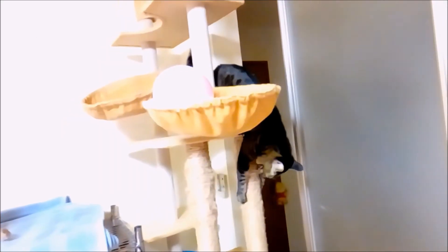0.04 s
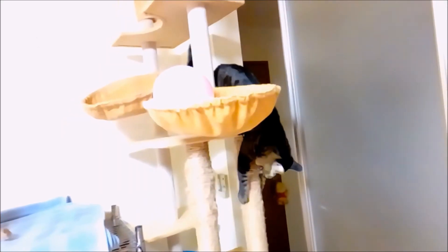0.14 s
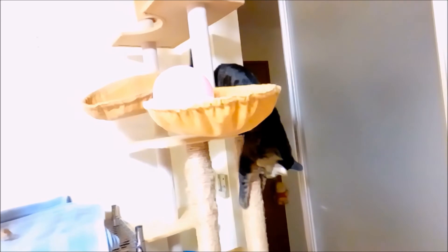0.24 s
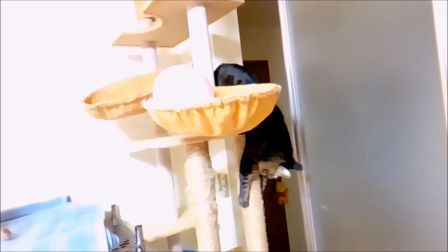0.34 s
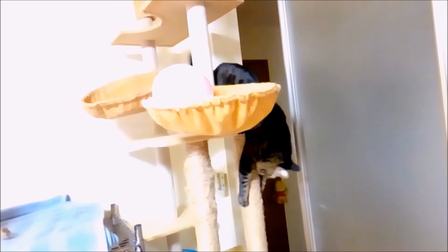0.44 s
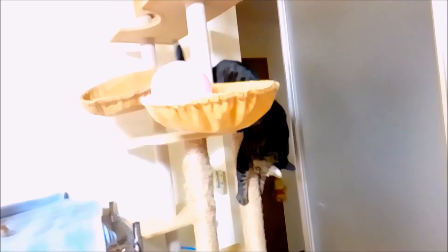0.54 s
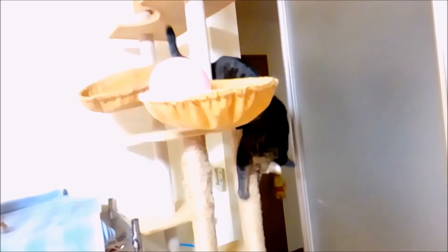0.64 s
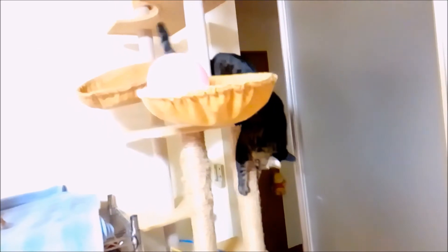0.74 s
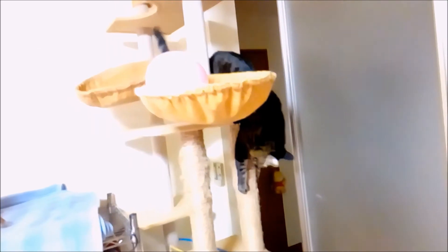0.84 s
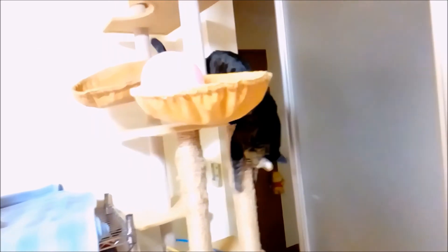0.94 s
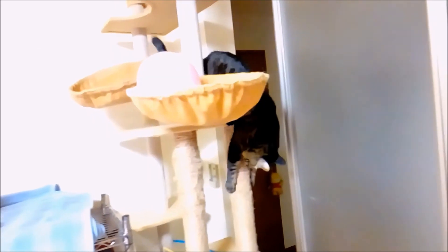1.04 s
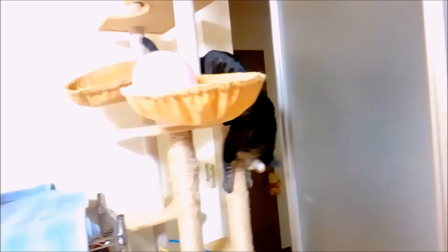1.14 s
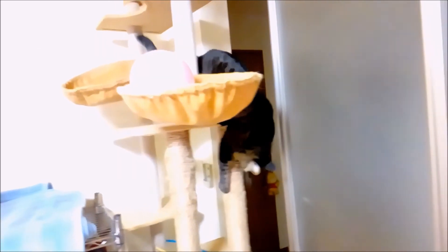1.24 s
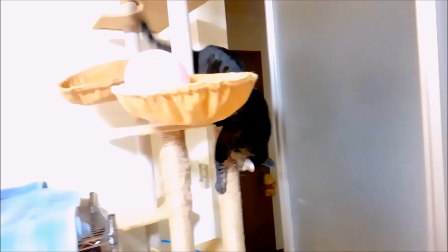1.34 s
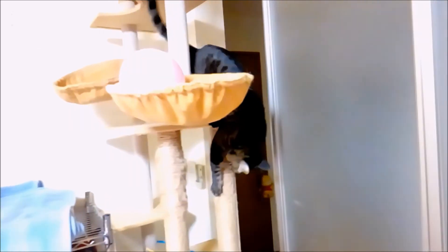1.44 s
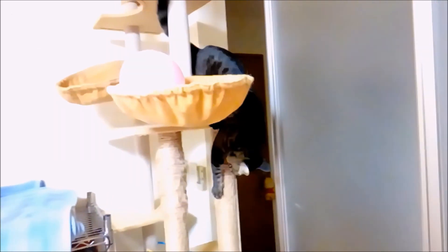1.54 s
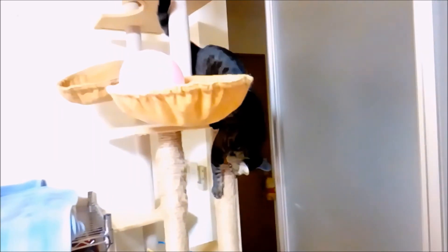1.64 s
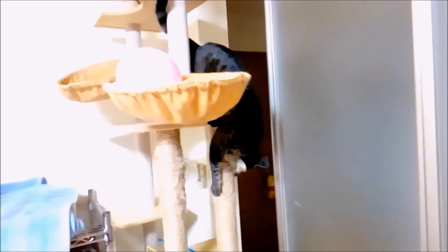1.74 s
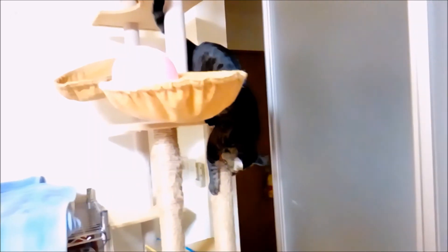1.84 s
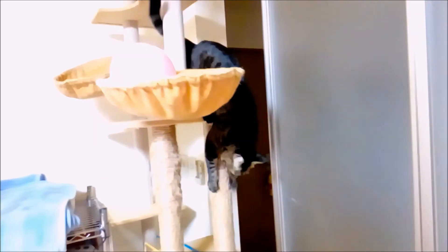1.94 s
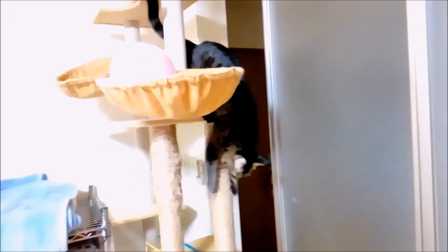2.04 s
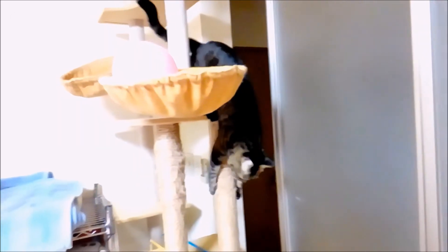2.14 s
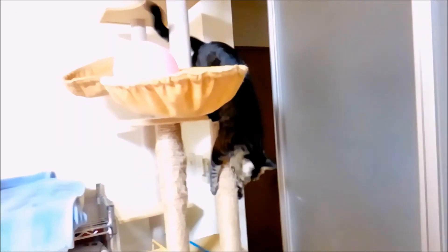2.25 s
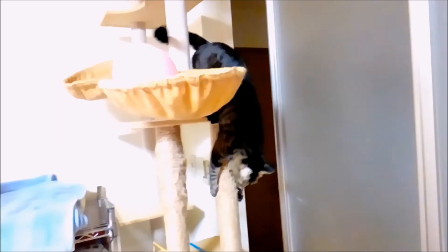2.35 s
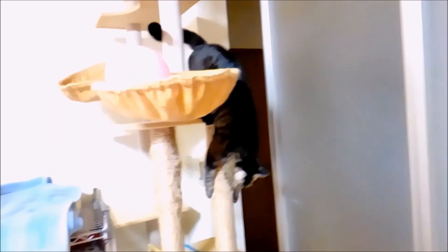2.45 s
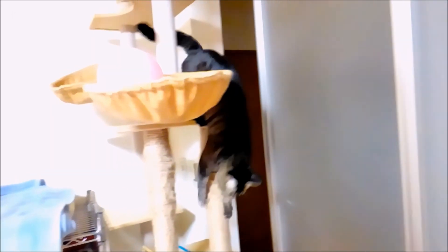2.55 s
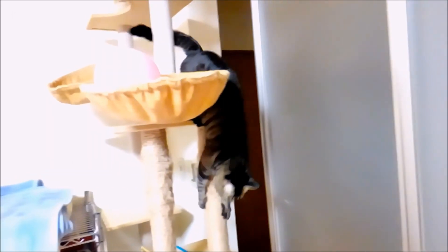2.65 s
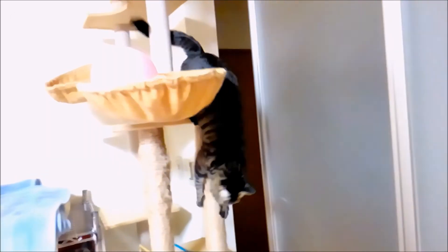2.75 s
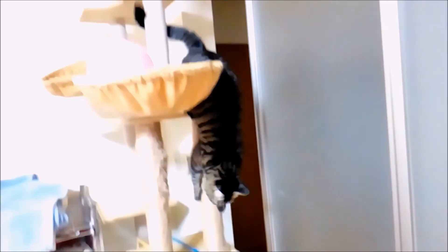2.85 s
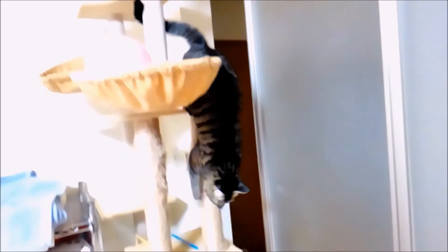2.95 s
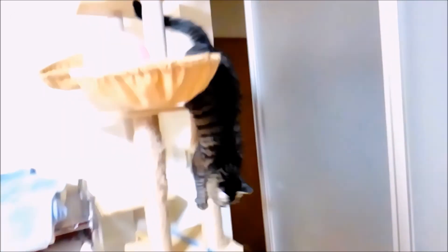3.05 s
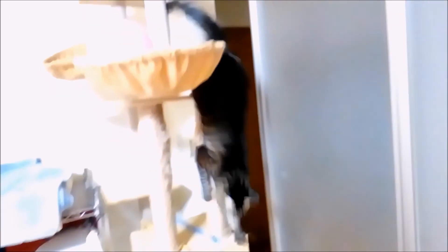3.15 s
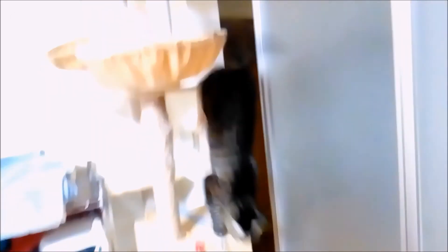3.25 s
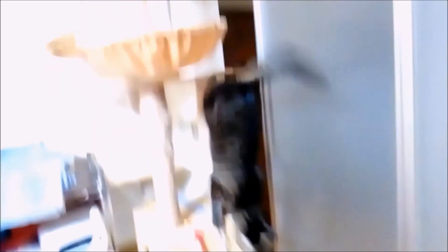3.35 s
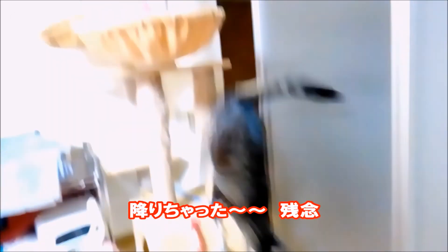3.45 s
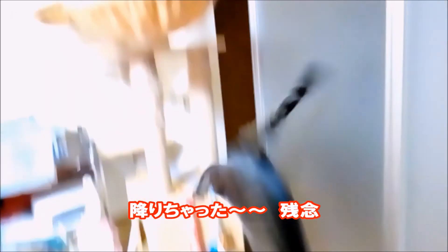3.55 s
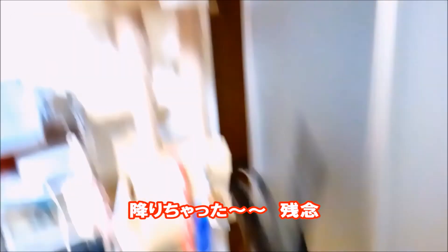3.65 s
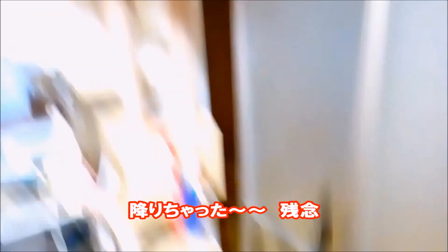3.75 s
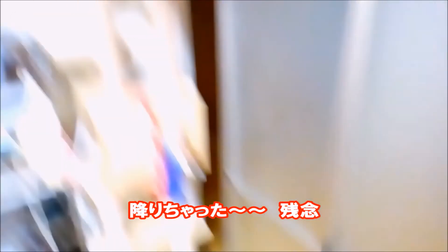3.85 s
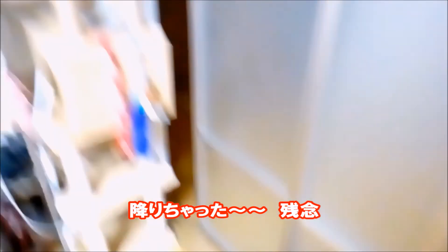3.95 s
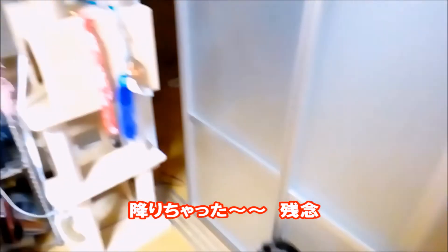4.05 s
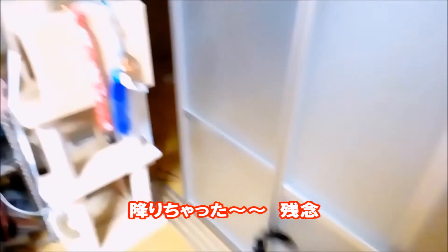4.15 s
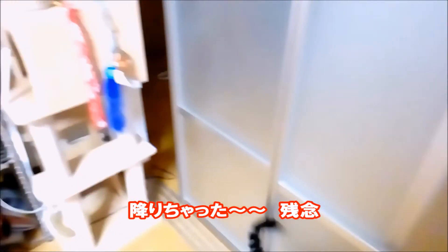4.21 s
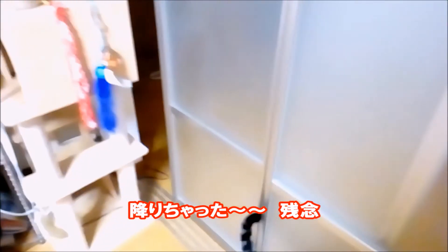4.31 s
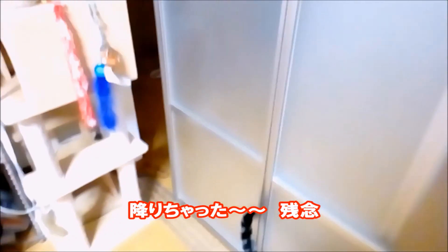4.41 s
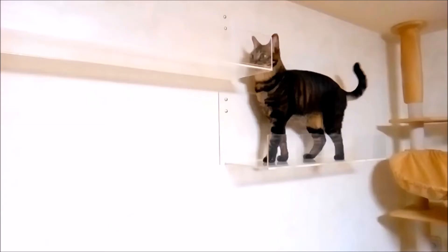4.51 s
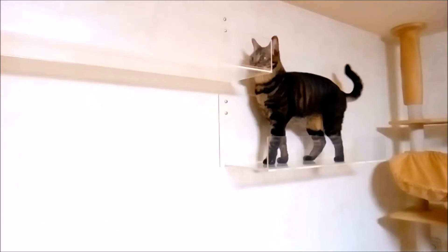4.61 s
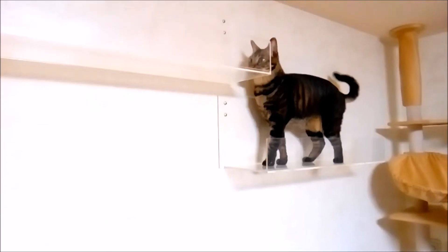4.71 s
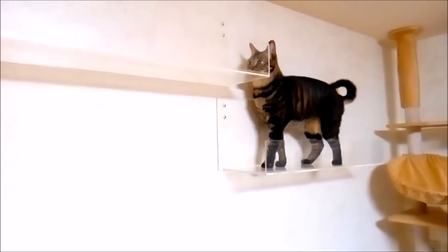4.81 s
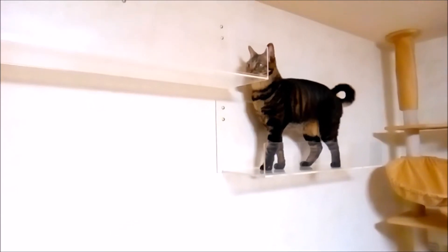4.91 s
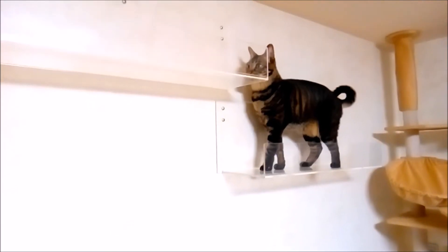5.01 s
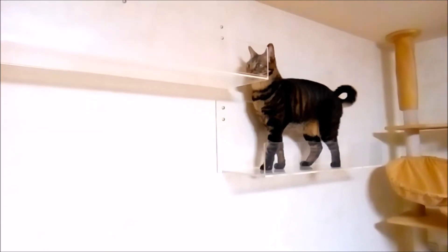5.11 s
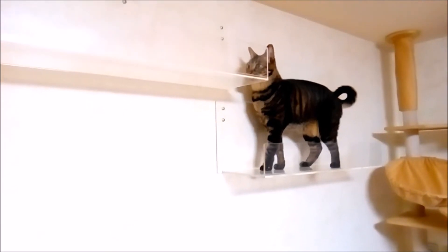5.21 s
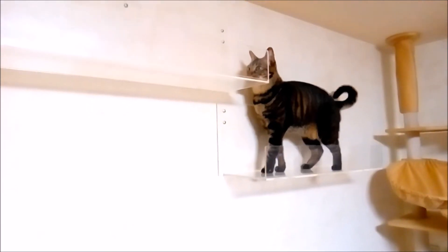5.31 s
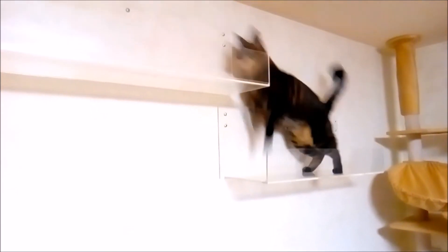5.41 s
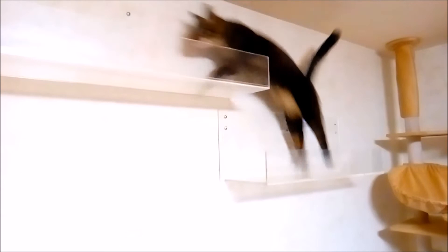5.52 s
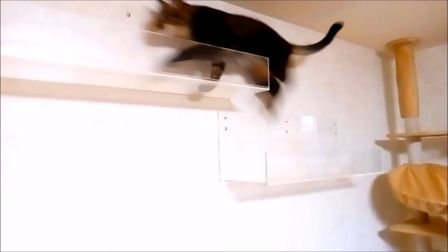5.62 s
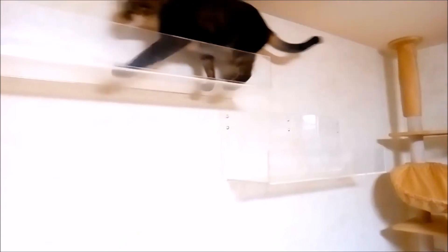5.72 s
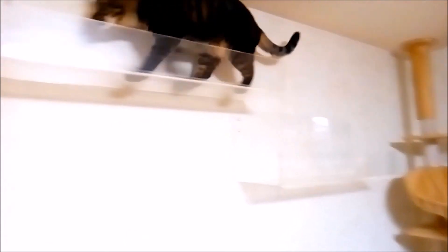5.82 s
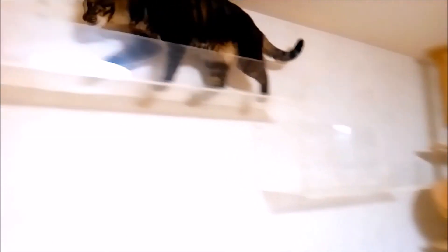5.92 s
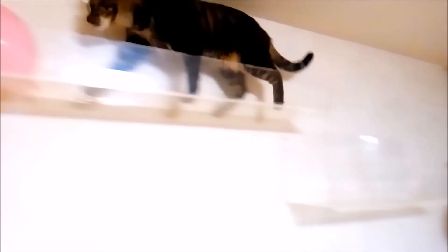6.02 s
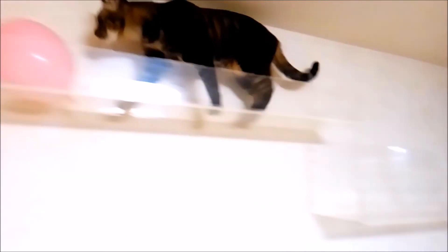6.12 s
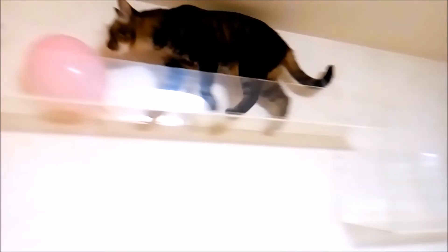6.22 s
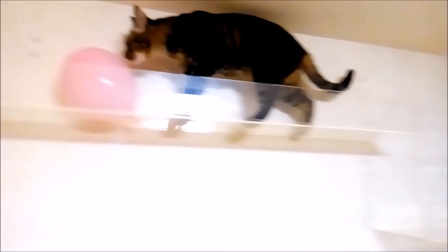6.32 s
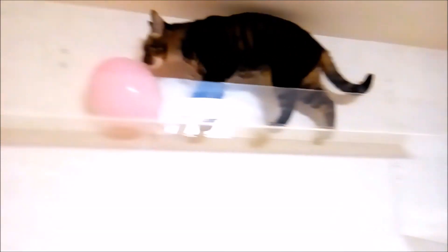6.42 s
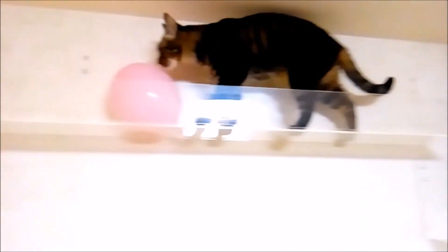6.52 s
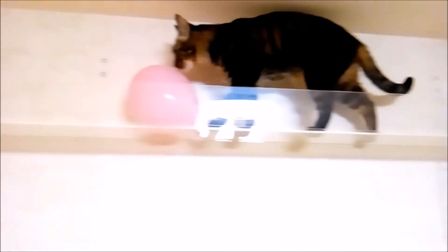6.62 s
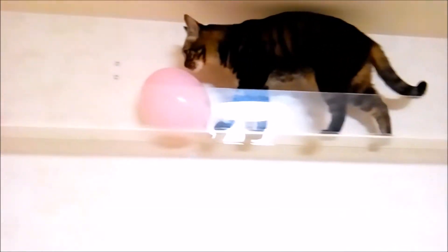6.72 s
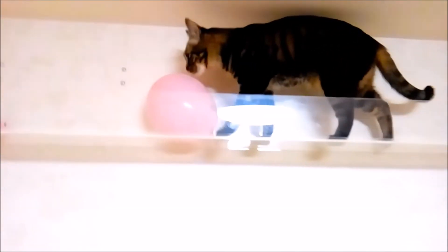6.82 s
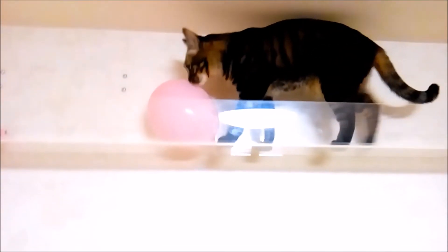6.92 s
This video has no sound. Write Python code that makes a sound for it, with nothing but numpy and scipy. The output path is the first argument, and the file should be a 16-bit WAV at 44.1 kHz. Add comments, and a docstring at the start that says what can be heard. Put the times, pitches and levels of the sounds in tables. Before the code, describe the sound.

A cat's paws knock and scratch on a wooden tower, then thump onto the floor and a wall shelf in a quiet room.

```python
"""A small room, with a cat on a wooden climbing tower near enough to stand clear of the reflections.
Paws knock the boards, claws tick and drag down a creaking rope post, and the cat lands on the floor.
The sound drops out briefly and fades back in; then the cat springs from one wall shelf to the next.
The microphone is a phone's: it hears all this over room tone, through the narrow resonance of its port."""
import sys
import numpy as np
from scipy import signal
from scipy.fft import rfft, irfft
from scipy.io import wavfile
from scipy.ndimage import uniform_filter1d

SR = 44100
rng = np.random.default_rng(int(sys.argv[2]) if len(sys.argv) > 2 else 0)


def waveform_to_disk(signal):
    """Save audio, clipped to [-1, 1], as 16-bit WAV at the path in sys.argv[1]."""
    frames = np.transpose(np.atleast_2d(signal))
    scaled = np.clip(frames, -1, 1) * 32767
    samples = np.round(scaled).astype(np.int16)
    wavfile.write(sys.argv[1], SR, samples)


N = 307228

# Modes of what is struck. Each row: pitch in Hz, relative level in dB, seconds to fall 60 dB.
TOWER_MODES = [(159.7, -5, .5), (214.6, 2, 0.11), (314.5, -5.5, 0.25), (404, -12.5, 0.043),
               (497, -1.5, 0.02), (624, -5, 0.035), (703, -2, 0.084), (792, -5, 0.048), (937, 0, 0.056),
               (1120, 1.5, 0.019), (1404, -1.5, 0.029), (1576, -3, 0.05), (1810, -13.5, 0.035),
               (2020, -11.5, 0.0076), (2335, -11, 0.053), (2760, -15.5, 0.022), (3100, -15.5, 0.0097)]
FLOOR_MODES = [(100, -21, 0.25), (134, -14.5, 0.2), (180, -13.5, .08), (267, -0.5, 0.088), (312, 7, 0.13),
               (343, 11.5, 0.15), (363, 3.5, 0.16), (427, -8, 0.043), (484, -0.5, 0.016), (586, -5, 0.018),
               (742, -2, 0.072), (791, -8.5, 0.0403), (930, 2.5, 0.016), (1018, -1, 0.015),
               (1300, -2, 0.026), (1594, -4.5, 0.031), (1800, -1, 0.013), (2220, -1.5, 0.0048),
               (2877, 0, .008), (3650, 0.5, 0.01)]
SHELF_MODES = [(66.6, -17, 0.35), (83.3, -10, 0.67), (133, -14, 0.32), (177, -4.5, 0.096),
               (201, 8.5, 0.068), (267.4, 15.5, 0.055), (306, 5, 0.089), (380, -36, 0.044),
               (450.1, 18.5, 0.0077), (590, -10, 0.023), (630, -10, 0.044), (744, -17, 0.0084),
               (982, -11.5, 0.061), (1160, -22, 0.061), (1690, -5.5, 0.0072)]
CLAW_MODES = [(1250, -6.5, 0.039), (1733, -2, 0.055), (2564, -3, 0.065), (3173, -2.5, 0.061),
              (4130, -3.5, 0.12), (4910, -3.5, 0.021), (5430, -2, 0.021), (6230, -8.5, 0.046)]
# Paw contacts. Each row: start in seconds, surface, claw scratch in dB, its thin edge in dB, board knock
# in dB, pitch of the struck spot in Hz, thud of the weight in dB, rise in ms, rattle decay in ms.
PAW_CONTACTS = [(0.046, "tower", -63, -72, -64.5, 725, -58.5, 2.2, 160),
                (0.154, "tower", -56, -76, -64.5, 865, -59.5, 4, 18),
                (0.365, "tower", -57.5, -93, -61.5, 1170, -55.5, 28, 24),
                (0.663, "tower", -47.5, -55, -60.5, 1780, -46.5, 0.14, 14),
                (0.679, "tower", -44.5, -55, -53, 1150, -56, 0.57, 22),
                (0.771, "tower", -56.5, -74, -63, 700, -86, 9.5, 9.4),
                (0.871, "tower", -59.5, -76, -96, 700, -89, 4, 11),
                (1.0136, "tower", -46.5, -62, -54, 1600, -65, 1.197, 2.2),
                (1.022, "tower", -45, -56.5, -49.5, 1500, -52.5, 0.3, 24),
                (1.1773, "tower", -48.5, -60, -58.5, 1100, -48.5, 0.15, 56),
                (1.2488, "tower", -19.5, -27, -26, 2970, -32.5, 0.83, 0.75),
                (1.254, "tower", -23.5, -36, -25.5, 620, -31.5, 0.22, 1.2),
                (1.26, "tower", -37.5, -49, -49, 950, -43, .5, 3.4),
                (1.268, "tower", -35, -48, -35, 650, -35, 1.6, 9.2),
                (1.3613, "tower", -43, -50, -25.5, 830, -40.5, 0.4, 11),
                (1.376, "tower", -50, -51.5, -28, 570, -41.5, 1.7, 25.3),
                (1.542, "tower", -64, -82, -56.5, 705, -83, 0.97, 14),
                (2.033, "tower", -56.5, -83, -71.5, 700, -66, 0.28, 75),
                (2.169, "tower", -66.5, -80, -68, 503, -56.5, 4.7, 39),
                (2.284, "tower", -46, -59, -43.5, 1120, -87, 0.36, 8.2),
                (2.298, "tower", -49.5, -65, -50, 720, -87, 1.5, 32),
                (2.365, "tower", -72, -81, -71.5, 1550, -69, 1.5, 8.),
                (3.273, "tower", -54, -74, -78, 1520, -56, 0.2, 36),
                (3.408, "tower", -57.5, -71, -70, 900, -54, 0.18, 12),
                (3.423, "tower", -55.5, -72, -77.5, 900, -65, 0.51, 16),
                (3.579, "tower", -64.5, -78.5, -52.5, 1850, -69.5, 1.2, 20),
                (3.787, "floor", -40.5, -57, -34, 2990, -67, .4, 4.6),
                (3.789, "floor", -45.5, -63, -25.5, 574, -24, 0.81, 13),
                (3.81, "floor", -43.5, -63, -33.5, 780, -32.5, 1.2, 20),
                (3.887, "floor", -48.5, -64, -40.5, 477, -44, 2.2, 13),
                (3.936, "floor", -45, -48.5, -57, 1300, -67, .15, 1.5),
                (3.939, "floor", -43.5, -59, -54.5, 830, -54, 0.6, 28.5),
                (4.95, "shelf", -67.5, -76, -68, 1350, -63.5, 22, 56),
                (5.428, "shelf", -60.5, -72, -47, 1150, -60, 4.8, 3.9),
                (5.436, "shelf", -59.5, -76, -37, 525, -28, 1.33, 29),
                (5.565, "shelf", -54, -72, -55, 700, -62, 3.5, 11),
                (5.579, "shelf", -43, -62, -65, 3300, -73, 4.1, 15),
                (5.585, "shelf", -40.5, -67, -56, 700, -66, 0.3, 8.5),
                (5.599, "shelf", -41, -58, -33.5, 970, -29, 3, 12.5),
                (5.794, "shelf", -59.5, -85, -54, 500, -49, 3.5, 38)]
# How each surface answers. Each row: the touch's thud over its knock in dB, the weight's knock over its
# thud in dB, the weight's rattle decay in ms, top of the knock in Hz.
SURFACES = {"tower": (-16.5, -10.5, 26.5, 4997.5), "floor": (0, -13.5, 48.5, 6001.5),
            "shelf": (11.5, -26.5, 83, 1700)}
# Drags down the rope post. Each row: start in seconds, length in seconds, claws in dB, shaken boards
# in dB, pitch the boards favour in Hz, post creak in dB, creak pitch at full pull in Hz.
ROPE_DRAGS = [(3.025, 0.084, -58.5, -66.5, 1530, -74, 216), (3.166, 0.067, -56, -62.5, 540, -66, 219),
              (3.237, 0.13, -61.5, -73, 1550, -60, 232.6), (3.432, 0.037, -58, -56, 890, -43, 289),
              (3.451, 0.054, -72, -51, 870, -63, 283.4), (3.513, 0.043, -63.5, -61, 794, -49, 254),
              (3.566, 0.099, -61, -52, 685, -60.5, 239.4), (3.687, 0.14, -67, -61, 750, -66.5, 255)]
# Decay of the room. Each row: frequency in Hz, seconds to fall 60 dB.
ROOM_DECAY = [(100, 0.44), (300, 0.35), (1000, 0.24), (3000, 0.27), (8000, 0.3)]
# Spectrum of the room tone. Each row: frequency in Hz, relative density in dB.
ROOM_TONE_SPECTRUM = [(25, -13.5), (60, -11.5), (100, 0), (150, -4), (210, 0.5), (260, -6), (330, -6),
                      (650, -11), (1300, -19.5), (3200, -23.5), (6500, -22), (8200, -16), (10100, -15.5),
                      (10800, -12), (11500, -19), (14500, -23.5), (15500, -19)]
# Resonances of the microphone port. Each row: centre in Hz, width in Hz, gain in dB.
PORT_RESONANCES = [(5000, 120, 8.5), (5290, 310, 12), (3810, 1800, -3)]

CREAK_PARTIALS_DB = [10, -12.5, -6.5, -25, -12]
CREAK_RISE, CREAK_WAVER = 0.083, 0.056  # shares of the creak's pitch
DRAG_ATTACK_S, DRAG_RELEASE_DB_PER_S = 0.0387, 501.5
DROPOUT_S, RETURN_S, FADE_IN_S = 4.496, 4.635, .22


def paws():
    """Claws and pad touch first; a moment later the cat's weight settles with a duller thud."""
    out = np.zeros(N + SR)
    modes = {"tower": TOWER_MODES, "floor": FLOOR_MODES, "shelf": SHELF_MODES}
    for start, surface, scratch_db, edge_db, knock_db, spot_hz, weight_db, rise_ms, decay_ms in PAW_CONTACTS:
        thud_over_db, knock_over_db, settle_ms, top_hz = SURFACES[surface]
        board = modes[surface], top_hz, spot_hz
        lag_ms = min(29 - 1.4 * (knock_db + 40), 24)  # the weight follows a hard knock sooner
        touch = contact(*board, rise_ms, decay_ms, knock_db + thud_over_db, knock_db, scratch_db, edge_db)
        weight = contact(*board, .2 * lag_ms, settle_ms, weight_db, weight_db + knock_over_db)
        for at, sound in ((start, touch), (start + lag_ms / 1000, weight)):
            first = int(at * SR)
            out[first:first + len(sound)] += sound
    return out[:N]


def contact(modes, top_hz, spot_hz, rise_ms, decay_ms, thud_db, knock_db,
            scratch_db=-np.inf, edge_db=-np.inf):
    """A paw on wood: its soft push drives the low modes, its rattle of slips the high ones and the claw."""
    t = np.arange(SR // 3) / SR
    rise_s = max(rise_ms, .05) / 1000
    envelope = (1 - np.exp(-t / rise_s)) ** 2 * np.exp(-t * 1000 / max(decay_ms, .5))
    noise, slip_size, grit = rng.standard_normal((3, len(t)))
    rattle = noise * np.abs(slip_size) * envelope
    # the pad presses once and lets go, more gently in a slow contact
    press_s = min(2 * rise_s, .003)
    press = np.where(t < press_s, np.sin(np.pi * t / press_s), 0) * min(.0025 / rise_s, 1)
    # only a heavy blow sets the whole frame swaying in its deepest mode
    deepest_hz, db, t60 = modes[0]
    sway = (deepest_hz, db + .4 * (thud_db + 30), t60)
    low, high = mode_rings([sway] + modes[1:], split_hz=450, spread_db=1.5)
    thud = band(drive(low, press + .5 * rattle), deepest_hz, 1500)
    knock = band(drive(high, rattle), 380, np.clip(4 / rise_s, 2200, 6000))  # slower is duller
    knock = struck_spot(band(knock, 270, top_hz), spot_hz)
    scrape = band(band(rattle * np.abs(grit) ** 1.1, 1300, 6200), 2700, 9000)
    claw_ring, _ = mode_rings(CLAW_MODES, split_hz=SR, spread_db=3)
    scratch = unit(scrape) + undb(-3.5) * unit(drive(claw_ring[:SR // 20], rattle))
    edge = band(rattle, 6610, 9850)
    # each level holds for the part's loudest moment as heard through the port
    parts = ((thud, thud_db), (knock, knock_db), (scratch, scratch_db), (edge, edge_db))
    return sum(undb(db) * part / loudest(mic_port(part[:SR // 10])) for part, db in parts)


def rope_drags():
    """Claws catch rope fibres in dense uneven slips that shake the boards, while the post creaks."""
    t = np.arange(N) / SR
    start, length, claws_db, boards_db, spots_hz, creak_db, creak_hz = np.transpose(ROPE_DRAGS)[:, :, None]
    release = undb(-DRAG_RELEASE_DB_PER_S * np.maximum(t - start - length, 0))
    pulls = np.clip((t - start) / DRAG_ATTACK_S, 0, 1) * release
    claws_gain, creak_gain = ((undb(db) * pulls).sum(axis=0) for db in (claws_db, creak_db))
    catches = rng.random(N) < 2500 / SR  # about 2500 a second
    slips = catches * rng.standard_normal(N) * undb(1.5 * wander(60))
    _, tower_ring = mode_rings(TOWER_MODES[2:], split_hz=0, spread_db=0)
    shaken = band(drive(tower_ring, slips), 240, 1700)
    boards = sum(gain * unit(struck_spot(struck_spot(shaken, hz), hz))
                 for gain, hz in zip(undb(boards_db) * pulls, spots_hz[:, 0]))
    creak = post_creak(creak_hz[np.argmax(pulls, axis=0), 0], pulls.max(axis=0))
    claws = band(band(slips, 4700, 6000), 4500, 5900) + undb(-18) * band(slips, 2100, 4400)
    return claws_gain * claws / np.std(mic_port(claws)) + boards + creak_gain * creak


def post_creak(full_pull_hz, pull):
    """The post sticks and slips at a nearly even rate that climbs with the pull."""
    hz = full_pull_hz * (1 + CREAK_RISE * (pull - 1) + CREAK_WAVER * wander(40))
    phase = 2 * np.pi * np.cumsum(hz) / SR
    partials = sum(undb(db) * np.sin(k * phase) for k, db in enumerate(CREAK_PARTIALS_DB, 1))
    return unit(undb(2.5 * wander(90)) * partials)


def ping(start_s=3.657, hz=12100, db=-55, t60_s=.07):
    """One thin high ring with a scratchy tail just above it."""
    age = np.maximum(np.arange(N) / SR - start_s, 0)
    hiss = unit(band(rng.standard_normal(N), .98 * hz, 1.1 * hz))
    tail = hiss * (age > 0) * undb(db - 15 - 25 * (age / .09) ** 3)
    return undb(db - 60 * age / t60_s) * np.sin(2 * np.pi * hz * age) + tail


def mode_rings(modes, split_hz, spread_db):
    """The ring below and above split_hz; every contact point weights and detunes the modes anew."""
    t = np.arange(SR // 4) / SR
    # each mode is a close trio, as boards and joints are never quite alike; high trios lie wider
    hz, db, t60 = np.repeat(np.transpose(modes), 3, axis=1)[:, :, None]
    hz = hz * (1 + 0.053 * np.resize([-1, 0, 1], len(hz))[:, None] * (hz > split_hz))
    chance = rng.standard_normal((len(hz), 2, 1))
    envelopes = undb(db + spread_db * chance[:, 0] - 60 * t / t60)
    rings = envelopes * np.sin(2 * np.pi * hz * (1 + 0.018 * chance[:, 1]) * t)
    is_low = hz[:, 0] < split_hz
    return rings[is_low].sum(axis=0), rings[~is_low].sum(axis=0)


def struck_spot(x, hz):
    """A board rings most near the pitch of the spot that is touched."""
    return resonance(x, hz, q=5.5, gain_db=7.5)


def room(x, reflections_db=-9):
    """Near walls send dense reflections after a few ms; each octave dies at its own rate."""
    t = np.arange(int(.6 * SR)) / SR
    hz, t60 = np.transpose(ROOM_DECAY)
    tail = 0
    for centre_hz in 50 * 2. ** np.arange(9):
        octave = band(rng.standard_normal(len(t)), centre_hz / 2 ** .5, centre_hz * 2 ** .5)
        tail += octave * undb(-60 * t / np.interp(np.log(centre_hz), np.log(hz), t60))
    tail *= np.clip((t - .003) / 0.0088, 0, 1)
    return x + undb(reflections_db) * drive(tail / np.sqrt(np.sum(tail ** 2)), x)


def room_tone(hush_db=-63.5, whine_hz=12897, whine_db=-85):
    """A faint whine in a hush whose half-octave bands flicker apart; the treble also flutters as one."""
    t = np.arange(N) / SR
    bin_hz = np.maximum(np.fft.rfftfreq(N, 1 / SR), 1)
    hz, db = np.transpose(ROOM_TONE_SPECTRUM)
    spectrum = rfft(rng.standard_normal(N)) * undb(np.interp(np.log(bin_hz), np.log(hz), db))
    flutter, hush = wander(45), 0
    for octave in np.log2(18) + np.arange(21) / 2:
        share = np.clip(1 - 2 * np.abs(np.log2(bin_hz) - octave), 0, 1)
        treble = np.clip((octave - np.log2(300)) / 2, 0, 1)
        flicker_db = (2.2 - 1.5 * treble) * wander(12) + 1.7 * treble * flutter
        hush += undb(flicker_db) * irfft(spectrum * share, N)
    hush = unit(hush)
    hush += (t > DROPOUT_S) * (undb(-5) - 1) * band(hush, 45, 255)  # less bass after the dropout
    return undb(hush_db) * hush + undb(whine_db) * np.sin(2 * np.pi * whine_hz * t)


def mic_port(x):
    """The microphone port lifts a narrow band near 5 kHz, with a broad dip below it."""
    for hz, width_hz, db in PORT_RESONANCES:
        x = resonance(x, hz, hz / width_hz, db)
    return x


def resonance(x, hz, q, gain_db):
    """Lift or dip the band around hz."""
    return x + (undb(gain_db) - 1) * signal.lfilter(*signal.iirpeak(hz, q, SR), x)


def drive(response, force):
    """An impulse response driven by a force, to the force's length."""
    return signal.fftconvolve(response, force)[:len(force)]


def band(x, lo_hz, hi_hz):
    return signal.sosfilt(signal.butter(2, [lo_hz, min(hi_hz, .45 * SR)], "bandpass", fs=SR, output="sos"), x)


def wander(rate_hz):
    """A glide between random levels; spread near 1."""
    hold = int(SR / rate_hz)
    return 1.57 * uniform_filter1d(np.repeat(rng.standard_normal(N // hold + 1), hold), hold)[:N]


def loudest(x):
    """Rms of the loudest 3 ms."""
    return np.sqrt(np.max(uniform_filter1d(x ** 2, size=128)))


def unit(x):
    """Scale to rms 1."""
    return x / np.sqrt(np.mean(x ** 2))


def undb(db):
    return 10 ** (np.asarray(db) / 20)


def scene():
    """What reaches the phone, in mono: the cat and its reflections over room tone."""
    return (room(paws() + rope_drags() + ping()) + room_tone())[None]


def record(dry, bass_hz=29.8, top_hz=15700):
    """The capsule sheds bass and the port rings; the sound drops out, fades back in and loses its top."""
    t = np.arange(N) / SR
    heard = mic_port(signal.sosfilt(signal.butter(2, bass_hz, "highpass", fs=SR, output="sos"), dry))
    heard *= np.where(t < DROPOUT_S, 1, np.clip((t - RETURN_S) / FADE_IN_S, 0, 1))
    return signal.sosfilt(signal.ellip(10, .2, 70, top_hz, fs=SR, output="sos"), heard)


dry = scene()
out = record(dry)
waveform_to_disk(out)
```